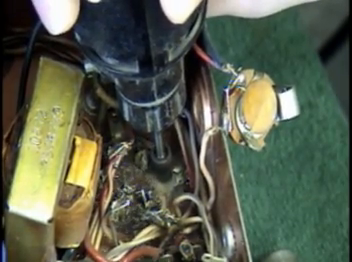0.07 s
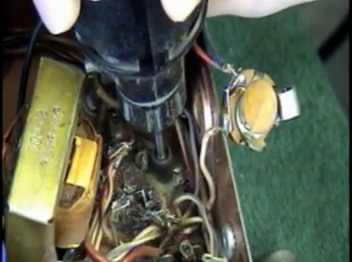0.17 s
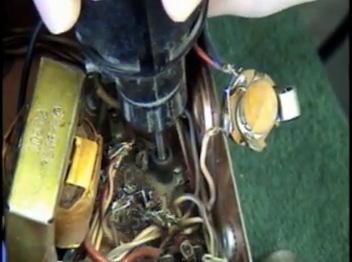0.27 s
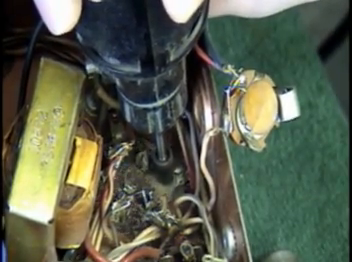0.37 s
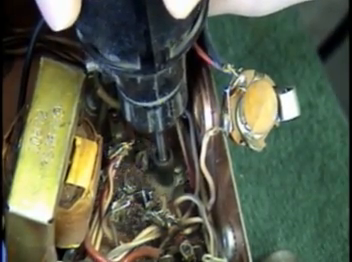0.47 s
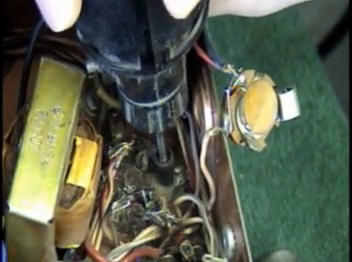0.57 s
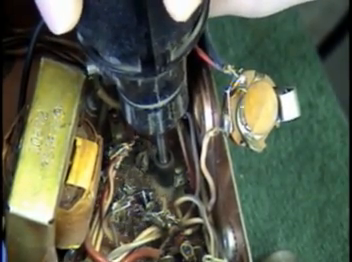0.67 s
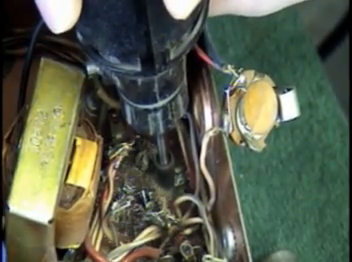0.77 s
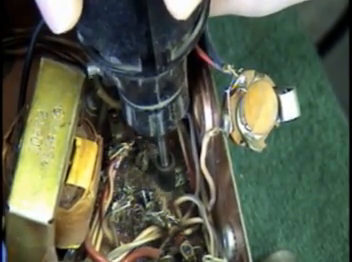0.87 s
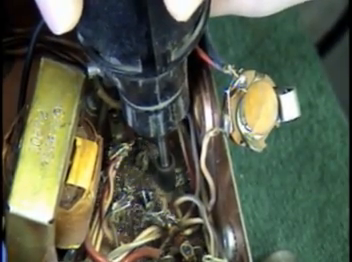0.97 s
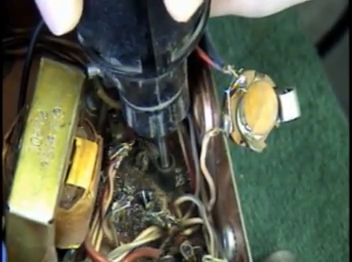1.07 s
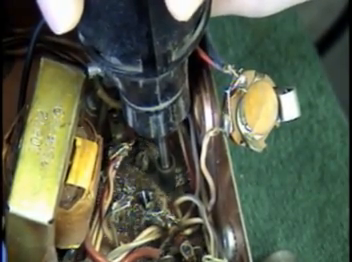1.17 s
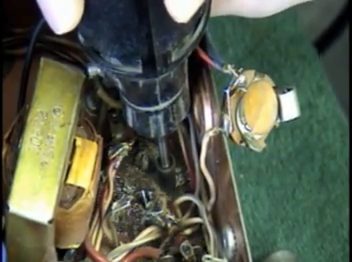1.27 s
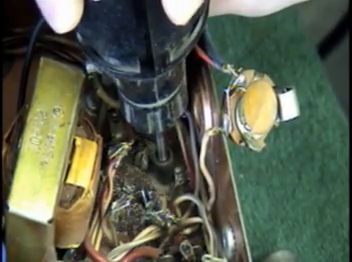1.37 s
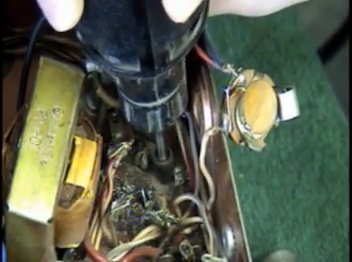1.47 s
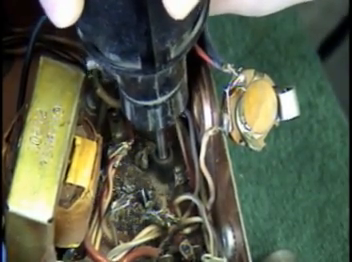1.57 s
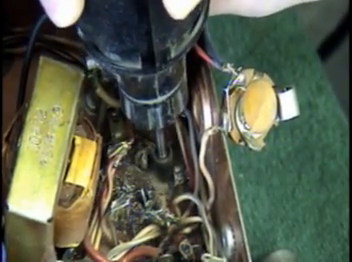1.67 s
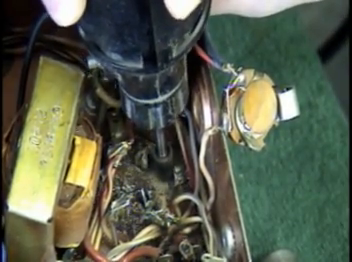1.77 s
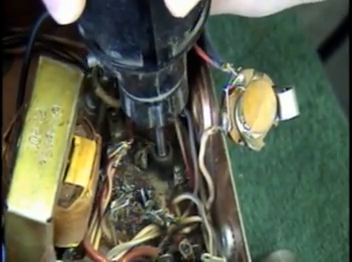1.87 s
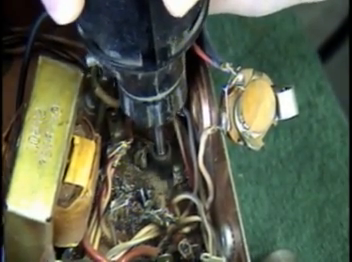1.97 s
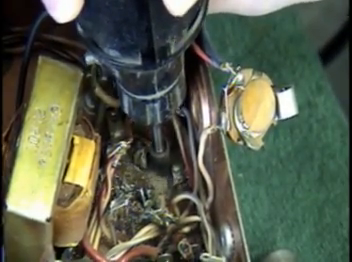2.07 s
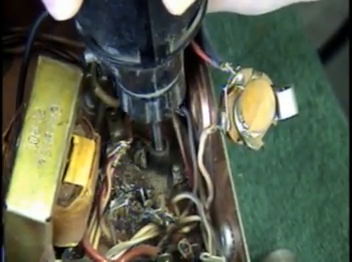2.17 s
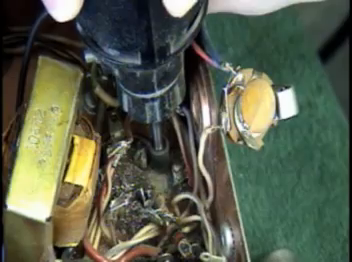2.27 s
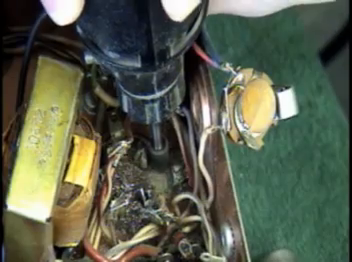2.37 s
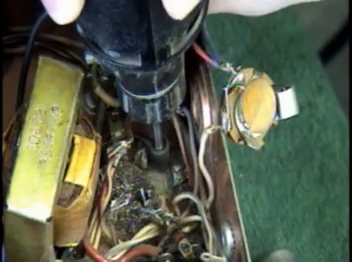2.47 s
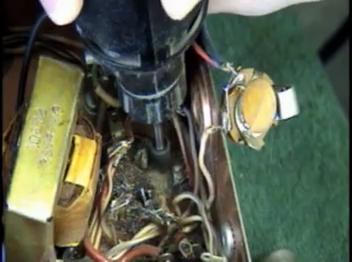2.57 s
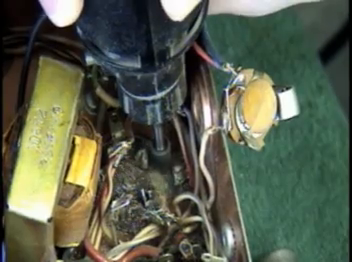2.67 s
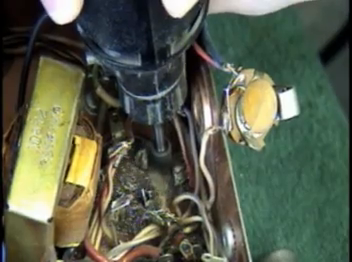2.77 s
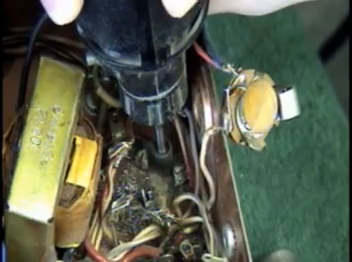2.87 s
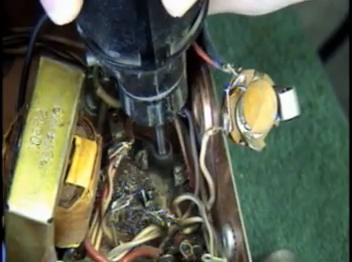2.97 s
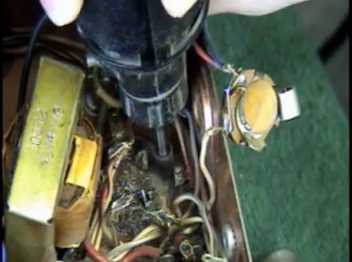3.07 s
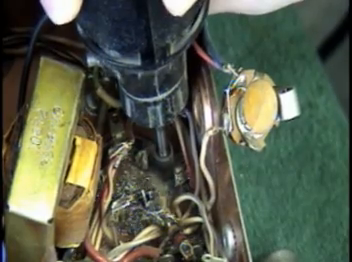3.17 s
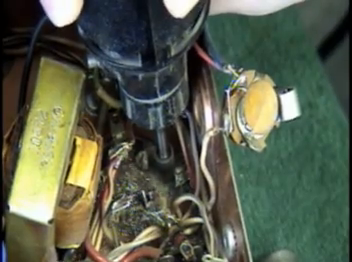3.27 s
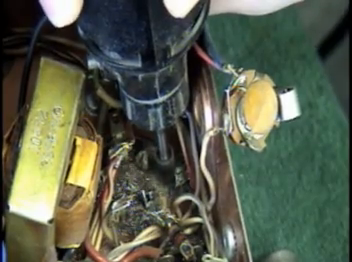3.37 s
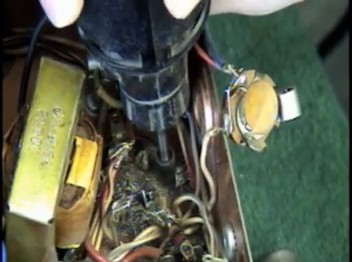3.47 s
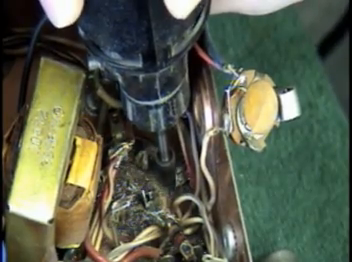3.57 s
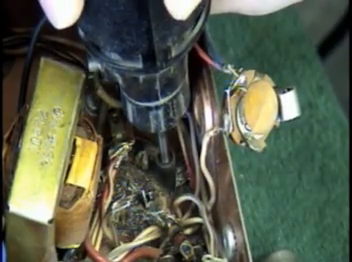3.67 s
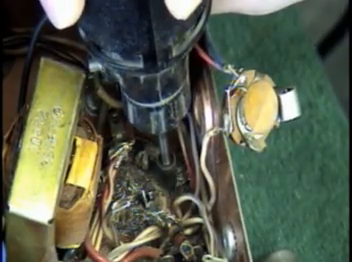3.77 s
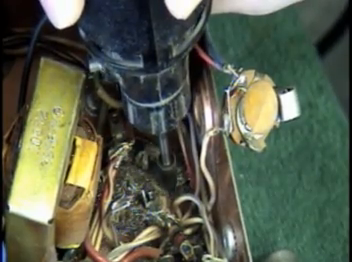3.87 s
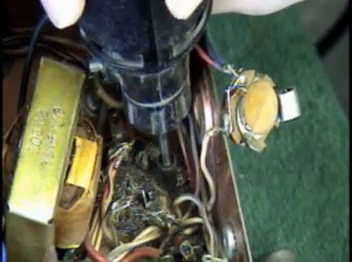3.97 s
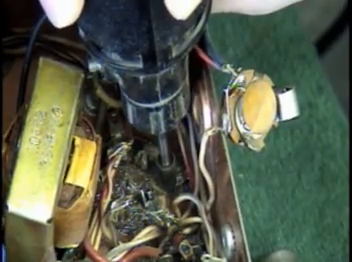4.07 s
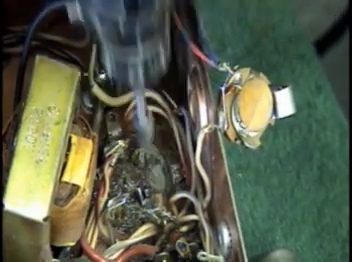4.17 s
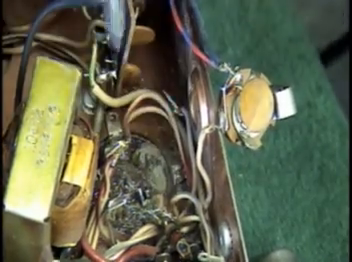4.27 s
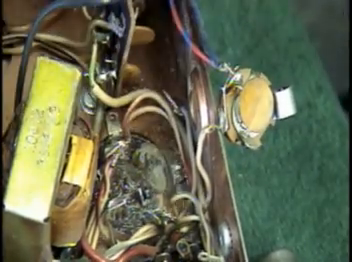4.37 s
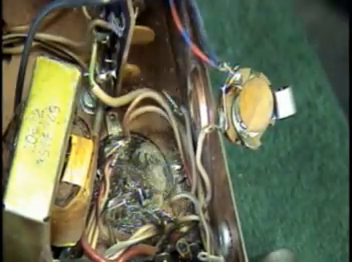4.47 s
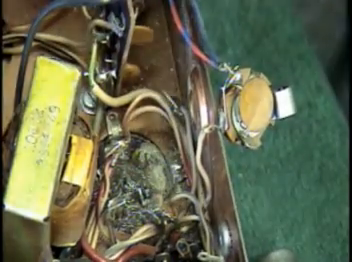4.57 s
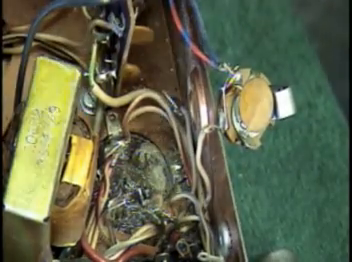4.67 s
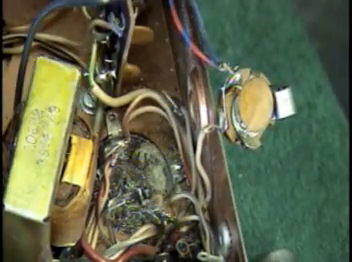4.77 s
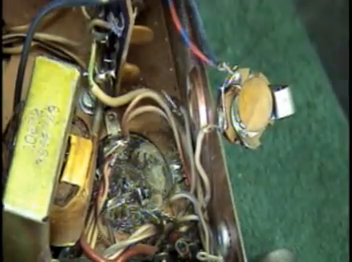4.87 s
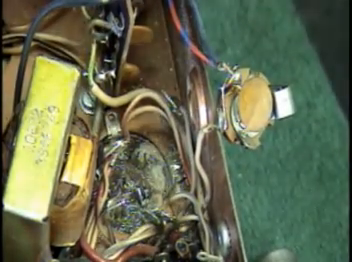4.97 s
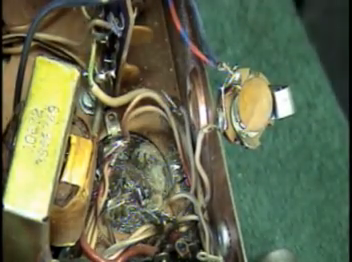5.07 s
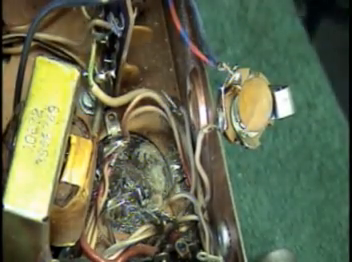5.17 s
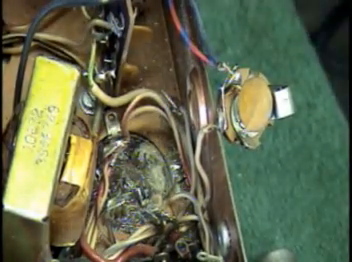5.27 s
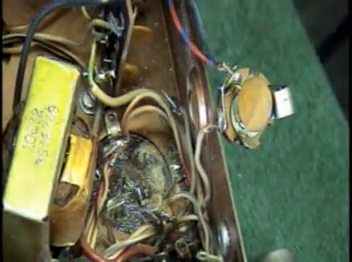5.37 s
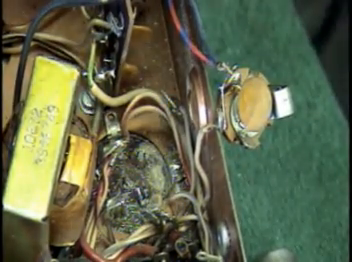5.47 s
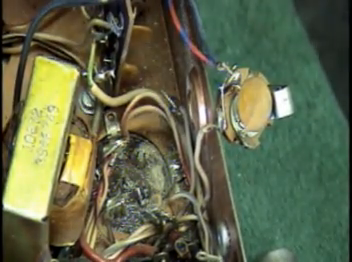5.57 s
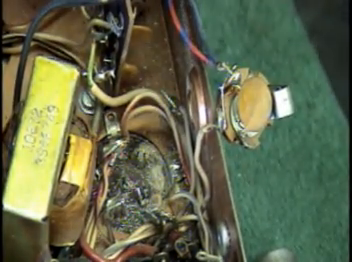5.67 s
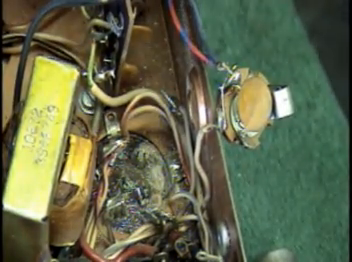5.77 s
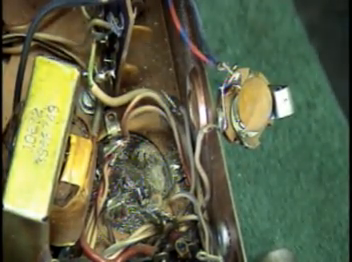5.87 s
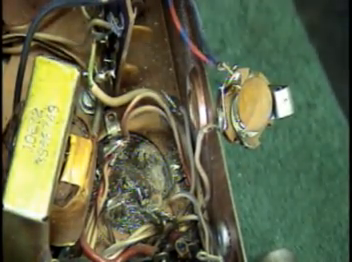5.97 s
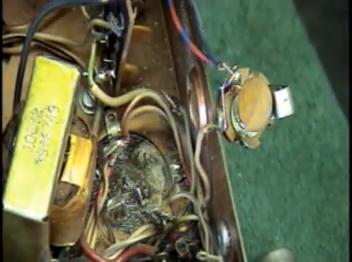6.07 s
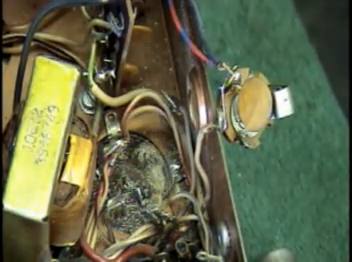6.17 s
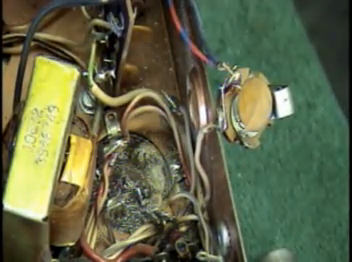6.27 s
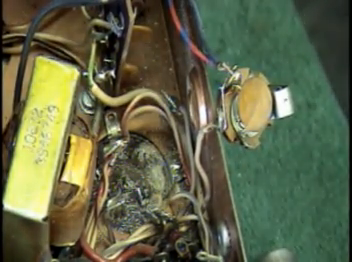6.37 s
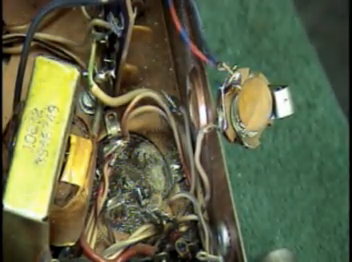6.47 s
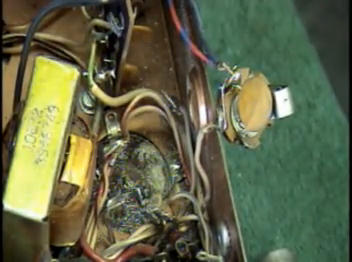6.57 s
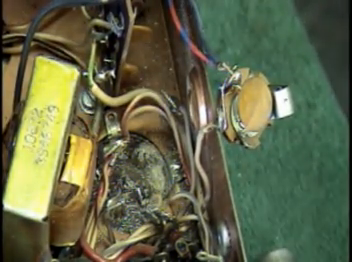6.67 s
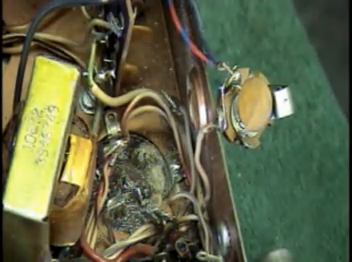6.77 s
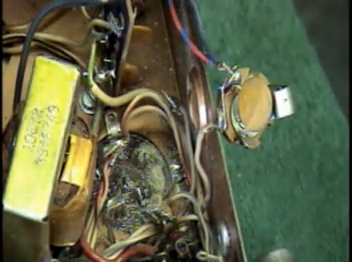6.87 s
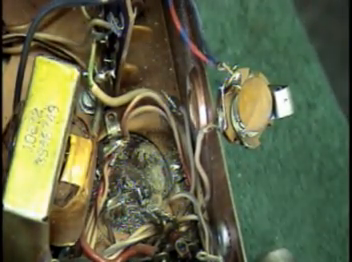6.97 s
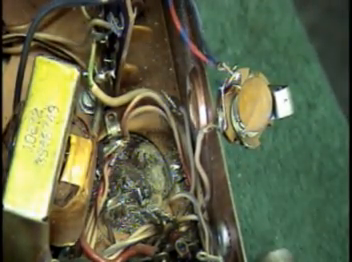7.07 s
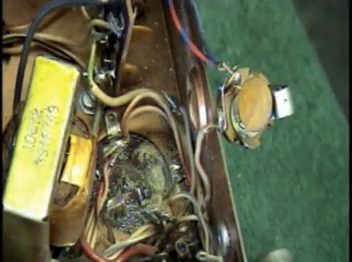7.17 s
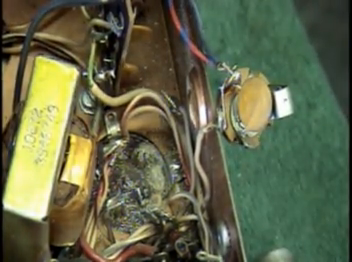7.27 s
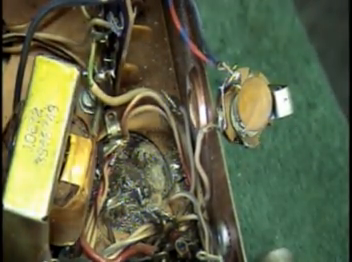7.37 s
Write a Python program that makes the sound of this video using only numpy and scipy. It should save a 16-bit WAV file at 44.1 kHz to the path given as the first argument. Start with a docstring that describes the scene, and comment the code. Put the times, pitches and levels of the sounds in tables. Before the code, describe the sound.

Close up, a small rotary tool grinds a steel tab in a metal chassis: bright gritty scraping, crackle, wavering whine, brief squeals and chatter. The stone lifts off and the motor rises to a cleaner, quieter whine. Then it coasts down, a switch clicks, and the tool is laid on the bench with small knocks. Faint rumble, hum, thin treble whine and hiss remain in a small, fairly dry workshop.

```python
"""Grinding steel with a rotary tool

A handheld rotary tool grinds a steel tab inside a metal chassis; load slows its shaft and the stone chatters.
Rough noise partly repeats with each turn, loose grit crackles, and tones follow the shaft speed.
The stone lifts off, the motor runs free, is switched off, coasts down and is laid on the bench:
noise bursts make the knocks. Low rumble, mains hum, a steady treble whine and hiss lie underneath."""
import sys
import numpy as np
from scipy import signal
from scipy.fft import rfft, irfft, next_fast_len
from scipy.io import wavfile
from scipy.ndimage import uniform_filter1d, map_coordinates

SR = 44100
rng = np.random.default_rng(int(sys.argv[2]) if len(sys.argv) > 2 else 0)


def unload_wav(signal):
    """Save mono or channel-first audio to the path in sys.argv[1] as 16-bit WAV at rate SR, clipped to [-1, 1]."""
    wavfile.write(
        sys.argv[1],
        SR,
        np.round(np.clip(np.atleast_2d(signal).T, -1, 1) * 32767).astype(np.int16),
    )


N = 326761  # samples in the scene

# Shaft speed under load; the last row is the lift-off: [t/s, speed/turns per s]
LOADED_SPEED = [(0.0, 256.5), (0.36, 251), (0.47, 266), (0.7, 282), (0.82, 285), (1.01, 308), (1.28, 316.5),
                (1.37, 330), (1.44, 314), (1.51, 309), (1.71, 315.5), (1.92, 346), (2.03, 350),
                (2.26, 351.5), (2.33, 339), (2.5, 317), (2.58, 304), (2.66, 285), (2.84, 276.5),
                (3.0, 283.3), (3.37, 283.5), (3.64, 292.7), (3.76, 298), (4.1, 313.6), (4.14, 330)]
# Stone scraping steel: [t/s, scrape level/dB, gain of the low end/dB, gain of the treble/dB]
SCRAPE = [(0.0, -22.5, -4, -2), (0.42, -22.5, -2, -2.5), (0.62, -22, -7, -3), (0.85, -22, -1, -4),
          (1.1, -21, -3, -7.5), (1.33, -23, 0.5, -4), (1.46, -25, -5, 1), (1.6, -25.5, -1, 2),
          (1.9, -28.5, 4.5, 2), (2.03, -27, 4.5, -2), (2.15, -27.5, 3, -1.5), (2.3, -22, 3.5, -7.5),
          (2.49, -19, -3.5, -11), (2.7, -21, 2.5, -4), (2.9, -23, 0.5, -1.5), (3.2, -23.5, -5, -1),
          (3.75, -22, -3, -3), (3.95, -24, -4.5, -7.5), (4.15, -29, 2.5, -8.5)]
# Air and brush noise of the motor: [t/s, level/dB, treble level/dB, left over right/dB]
MOTOR_NOISE = [(4.16, -36.5, -41.5, 0.5), (4.37, -35, -37, 0.5), (4.67, -36, -34.5, -0.5),
               (4.82, -34.5, -35.5, 0), (4.95, -38.5, -39, 0.5), (5.15, -40, -40.5, 0.5),
               (5.56, -46.5, -43.5, 0), (5.93, -54, -44, 1), (6.14, -54, -48, 1), (6.34, -61, -53, -0.5),
               (6.5, -66, -76, -3)]
# The stone skips and bites: [t/s, burst level before filtering/dB, length/s]
CHATTER = [(1.381, -22, 0.0083), (1.422, -27, 0.0094), (1.96, -25.5, 0.0078), (2.051, -27.5, 0.011),
           (2.434, -24, 0.0062), (2.49, -24, 0.0069), (2.518, -22.5, .006), (2.576, -23, .006),
           (2.662, -18.5, 0.0067), (3.9, -27, 0.0077), (3.9594, -21, 0.013), (4.03, -25, 0.024),
           (4.083, -27, 0.013)]
# Switch, hands and tool on the bench, before they ring:
# [t/s, relative click level/dB, relative thud level/dB, click centre f/Hz, click time to fall 60 dB/s]
KNOCKS = [(5.006, -23.5, -68, 6720, .04), (5.151, -42, -70, 2983, .05), (5.331, -32.5, -61, 698, 0.2),
          (5.881, -27.5, -63, 958, 0.2), (6.084, -39, -39.5, 2200, 0.15), (6.135, -32, -50, 3320, 0.11),
          (6.1716, -22, -31.5, 1960, 0.095), (6.20, -35.5, -48, 1800, 0.38), (6.229, -38, -47, 1500, 0.18),
          (6.292, -34.5, -41.5, 900, 0.13), (6.321, -43, -54, 791, 0.091), (6.978, -36.5, -58, 1720, 0.23),
          (7.045, -36, -66, 1710, 0.027)]
# Colour of stone on steel: [f/Hz, relative level per Hz/dB]
STEEL_COLOUR = [(120, -71), (200, -74), (320, -32), (476, -29), (560, -22), (789, -19), (1130, -7),
                (1490, -9.5), (1950, -3), (2130, -5), (3060, -3.5), (4160, -7), (7410, -4), (13000, -7),
                (15000, -14)]
# Resonances of the chassis: [f/Hz, width/Hz, relative level/dB]
CHASSIS_MODES = [(1930, 160, -8), (2576, 120, 13), (3030, 33, -6), (3430, 16, 16), (4945, 700, 1.5),
                 (6395, 43, -9), (6390, 73, 9.5), (7590, 62, 17.5), (9000, 67, 0), (9380, 32, -17),
                 (9900, 39, 11), (11700, 200, -43)]
# Colour of the air and brush noise: [f/Hz, relative level per Hz/dB]
AIR_COLOUR = [(120, 5), (200, -30.5), (350, -13), (659, -12.5), (1030, 0), (1330, -5), (1750, 0), (2330, 0),
              (3470, 7), (4230, -1), (7970, 1.5), (13500, -10.5), (15000, -27)]
# Resonances of the tool casing when knocked: [f/Hz, width/Hz, relative level/dB]
CASING_MODES = [(1016, 98, 1), (1770, 47, 8), (2420, 126, -18), (3870, 113, -33)]
# Resonances of the bench: [f/Hz, width/Hz, relative level/dB]
BENCH_MODES = [(93.5, 42, -6), (163, 51, 7), (294.3, 400, 1), (523, 146, 3.5), (685.5, 38, 1.5)]
# Mains hum, before it swells: [f/Hz, relative level/dB]
HUM = [(120, -71), (240, -71), (360, -65.5), (480, -73.5), (720, -72.5), (840, -76)]
# Steady high tones: [f/Hz, relative level/dB]
WHINE = [(4500, -71.5), (5432, -73), (5717, -74), (5814, -72), (6132, -71), (6514, -86), (6794, -69),
         (7278, -69), (7720, -69), (7757, -67), (7854, -69), (10056, -69.5), (10207, -77), (10632, -86)]
# Colour of the hiss: [f/Hz, relative level per Hz/dB]
HISS_COLOUR = [(20, -13), (50, -24), (90, -9), (160, -3.5), (400, -6.5), (1000, -4), (2000, -12),
               (4000, -13), (4600, -9), (7500, -7), (9000, -13), (12500, -20.5), (13300, -60)]
# How alike left and right are: [f/Hz, likeness from 0 to 1]
LIKENESS = [(100, 1), (300, 0.97), (1000, 1), (3000, 0.94), (7000, 0.87), (14000, 0.89)]
# Which side the direct sound leans to: [f/Hz, left over right/dB]
LEAN = [(150, 1), (300, -2.5), (600, 1.1), (1300, 0.5), (2800, 1.5), (5500, -3), (10000, 0.7)]
# How long the room rings: [f/Hz, time to fall 60 dB/s]
ROOM_DECAY = [(200, 0.32), (2000, 0.43), (10000, 0.15)]
# The hum swells: [t/s, gain/dB]
HUM_SWELL = [(0, -22), (4, -15), (5.5, -0.5), (6.5, 1.5), (7, 3.5), (7.41, 5.5)]
# One faint squeak: [t/s, f/Hz, peak level/dB, half length/s]
SQUEAK = (6.49, 4300, -62, .012)
# Steady low rumble: [f/Hz, relative level/dB]
RUMBLE = [(30, -64.5), (60, -69), (120, -74), (150, -84)]
# Resonances of the motor housing: [f/Hz, width/Hz, relative level/dB]
HOUSING_MODES = [(1160, 130, -0.5), (3200, 140, -4), (4900, 110, -8), (7580, 130, 1)]
# A narrow whir as the shaft dies: [t/s, level/dB]
WHIR = [(5.3, -80), (5.7, -70), (5.9, -55), (6.25, -61), (6.38, -64), (6.43, -85)]
# Tones that swell while grinding: [multiple of the shaft speed]
CUT_ORDERS = (2, 4, 5, 6, 7, 8, 9, 11, 12)
# Their levels before the tab blooms: [level over the scrape/dB]
CUT_TONE_LEVELS = (-39.5, -26, -28.5, -29.5, -28, -28, -26, -28, -27)
# Running free: 8 fan blades, overtones and sidebands of fan and commutator: [multiple of the shaft speed]
FREE_ORDERS = (2, 8, 11, 13, 16, 17, 24)
# Their levels at full speed, before the shell blooms: [level/dB]
FREE_TONE_LEVELS = (-63, -59, -60, -59, -63, -63, -66)
# A grinding tone blooms as it passes these resonances of the tab: [f/Hz, width/Hz, relative level/dB]
TAB_MODES = [(1157, 180, -2.5), (1620, 81, 8.5), (1868, 78, 10.5), (2355, 44, 11.5), (3060, 260, 3.5),
             (3700, 160, 2)]
# A free tone blooms as it passes these resonances of the shell: [f/Hz, width/Hz, relative level/dB]
SHELL_MODES = [(1100, 52, 4), (3360, 170, 9), (5300, 93, 6), (6150, 150, -1), (7880, 210, 13.5)]
# Shaft tones that rise and fall throughout:
# [t/s, imbalance level/dB, low grinding tone level/dB, commutator level/dB]
MAIN_TONES = [(0, -72, -54, -46), (.36, -63.5, -60.5, -36), (.8, -65, -43.5, -46), (1.05, -68, -51, -37),
              (1.36, -53, -45, -36.5), (1.6, -76.5, -42.5, -33), (1.8, -52.5, -49, -40.5),
              (1.98, -64, -52, -36.5), (2.15, -55.5, -47, -33), (2.5, -46.5, -42.5, -40),
              (2.8, -55.5, -70, -44), (2.95, -58, -42, -39), (3.4, -66, -46, -37), (3.9, -75, -45, -46),
              (4.1, -55, -52, -40), (4.2, -72, -68, -36.5), (4.4, -61, -70, -37.5), (4.75, -56, -70, -37.5),
              (4.93, -59, -70, -31.5), (5.0, -63, -72, -40), (5.1, -62, -72, -37), (5.3, -72, -70, -50),
              (5.55, -78, -78, -52.5), (5.75, -77, -80, -69), (6.0, -90, -90, -90)]
# Where those three tones sit: [multiple of the shaft speed]
MAIN_ORDERS = (1, 3, 10)
# A shaft tone flares into a squeal: [t/s, multiple of the shaft speed, peak level/dB, half length/s]
SQUEALS = [(0.106, 5, -44, 0.27), (.05, 7, -38, 0.058), (0.397, 4, -36, 0.034), (0.553, 7, -34.5, 0.065),
           (0.697, 4, -38, 0.045), (.72, 9, -39, .05), (0.847, 7, -33, 0.061), (1.05, 4, -45, 0.17),
           (1.376, 9, -28.5, 0.017), (1.385, 5, -38, 0.021), (1.44, 9, -37, 0.027), (2.067, 9, -30, .04),
           (2.183, 11, -37.5, 0.078), (2.24, 5, -34.5, 0.021), (2.343, 7, -30, 0.055), (2.336, 4, -37, .05),
           (2.52, 5, -37, 0.081), (2.677, 4, -31.5, 0.015), (2.766, 7, -33.5, 0.061), (2.948, 7, -35, 0.12),
           (3.004, 4, -40, 0.18), (3.25, 23, -34, .1), (3.647, 4, -42, .08), (3.7, 5, -44, .15),
           (3.927, 8, -33.5, 0.054), (4.45, 16, -51, .17), (5.43, 16, -48, 0.045), (5.464, 24, -51, .03)]

REPEATS, FREE_REPEATS = 0.52, 0.5  # share of the roughness power that repeats each turn: grinding, motor
FREE_HZ, SPIN_UP_S, OFF_S = 388.3, .072, 4.815  # free speed, time constant to reach it, switch-off
# Coasting: steady braking, plus speed lost early to fan drag and the time constant of that loss
FRICTION_HZ_PER_S, DRAG_HZ, DRAG_S = 190, 62, .34
FADE_DB_PER_OCTAVE = 12  # free tones weaken as the shaft slows
OCTAVE_DB = -56  # octave of the commutator tone, at full speed before the shell blooms
WALL_ECHO_S, WALL_ECHO = 0.000492, 0.19  # a near chassis wall: delay, strength in the high treble
TOP_HZ = 15140  # band limit of the whole scene


def amp(db):
    """Gain of a level in dB."""
    return 10 ** (np.asarray(db) / 20)


def unit(x):
    """x scaled to an average (rms) level of 1."""
    return x / np.sqrt(np.mean(x ** 2) + 1e-20)


def along(points, hz):
    """Read a value at hz between table points, on a log frequency axis."""
    f, v = np.transpose(points)
    return np.interp(np.log(hz + 1), np.log(f + 1), v)


def curves(rows):
    """One value per sample for each column after the time; the end values hold outside the table."""
    s, *cols = np.transpose(rows)
    return [np.interp(np.arange(N) / SR, s, c) for c in cols]


def wobble(rate):
    """A smooth random curve with rate new points a second."""
    points = rng.standard_normal(int(N * rate / SR) + 4)
    return map_coordinates(points, [np.arange(N) * rate / SR])


def filtered(x, response):
    """Shape the spectrum of x by a response given as a function of frequency."""
    m = next_fast_len(N + SR // 2)
    return irfft(rfft(x, m) * response(np.fft.rfftfreq(m, 1 / SR)), m)[..., :N]


def modes(table):
    """Response of a set of resonances, each one opposite in sign to the one before."""
    def mode(f, centre, width):
        return 1j * f * width / (centre * centre - f * f + 1j * f * width)
    return lambda f: sum((-1) ** k * amp(db) * mode(f, c, w) for k, (c, w, db) in enumerate(table))


def split(x, low_db, high_db, low_hz, high_hz):
    """Give the low and high ends of x their own gains."""
    low = filtered(x, lambda f: 1 / (1 + (f / low_hz) ** 8))
    high = filtered(x, lambda f: 1 - 1 / (1 + (f / high_hz) ** 8))
    middle = x - low - high
    return middle + amp(low_db) * low + amp(high_db) * high


def per_turn(turns, wear, spiky_db, size):
    """A rough profile of size points, read once a turn; it blends into a new one wear times a second."""
    shape = (int(N * wear / SR) + 4, size)
    spikes = amp(spiky_db * np.minimum(rng.exponential(1, shape), 2.5))
    rim = rng.standard_normal(shape) * spikes
    rim /= np.std(rim, axis=1, keepdims=True)
    rim = np.concatenate([rim, rim[:, :2]], 1)  # join the end of the turn to its start
    place = [np.arange(N) * wear / SR, turns % 1 * size]
    return unit(map_coordinates(rim, place, order=1))


def tones(turns, orders, levels, flutter_db, slip):
    """Sines at multiples of the shaft speed that flutter in level and slip in phase."""
    total = 0
    for k, db in zip(orders, levels):
        gain = np.sqrt(2) * amp(db + flutter_db * wobble(35))
        total = total + gain * np.sin(2 * np.pi * k * turns + slip * wobble(40))
    return total


def background():
    """Low rumble, mains hum and whine are sums of fixed-pitch sines; hiss is noise, wider in the treble."""
    t = np.arange(N) / SR

    def sines(table):
        return sum(amp(db + 0.5 + 0.74 * wobble(15)) * np.sin(2 * np.pi * (hz * t + rng.random()))
                   for hz, db in table)

    def hiss_colour(f):
        return amp(along(HISS_COLOUR, f)) * [np.ones_like(f), 1.38 * f / (f + 900)]

    hum = amp(curves(HUM_SWELL)[0]) * sines(HUM)
    whine = sines(WHINE) * amp([[-1.5], [1.5]])  # left, right
    mid, side = filtered(rng.standard_normal((2, N)), hiss_colour)
    hiss = amp(-56.0) * unit(np.array([mid + side, mid - side])) * amp([[-.8], [.8]])
    return sines(RUMBLE) + hum + whine + hiss


def shaft():
    """Turns per second: held down by the load, then rising to free speed, then coasting."""
    t, (lift_s, lift_hz) = np.arange(N) / SR, LOADED_SPEED[-1]
    rising = FREE_HZ - (FREE_HZ - lift_hz) * np.exp(-np.clip(t - lift_s, 0, None) / SPIN_UP_S)
    off = np.clip(t - OFF_S, 0, None)  # time since switch-off
    lost = FRICTION_HZ_PER_S * off + DRAG_HZ * (1 - np.exp(-off / DRAG_S))
    return np.where(t < lift_s, curves(LOADED_SPEED)[0], np.clip(rising - lost, 1, None))


def grinding(turns):
    """The stone's rim repeats each turn; loose grit adds crackle; both ring in the chassis."""
    scrape_db, low_db, sizzle_db = curves(SCRAPE)
    t = np.arange(N) / SR

    def colour(f):
        return amp(along(STEEL_COLOUR, f)) * (1 + 0.55 * modes(CHASSIS_MODES)(f))

    def wall(f):  # the treble comes back inverted
        echo = np.exp(-2j * np.pi * f * WALL_ECHO_S) * f ** 2 / (f ** 2 + 5000 ** 2)
        return 1 - WALL_ECHO * echo

    rim = unit(filtered(per_turn(turns, wear=16.0, spiky_db=5.0, size=128), colour))
    spikes = np.minimum(rng.exponential(1, N), 3.5)
    grit = rng.standard_normal(N) * amp(1.8 * spikes + 0.7 * wobble(300))
    # high spots throw grit at similar angles from turn to turn
    grit *= amp(3.0 * per_turn(turns, wear=6.0, spiky_db=0, size=5))
    # the flow of grit is even over several turns
    grit /= np.sqrt(np.abs(uniform_filter1d(grit ** 2, size=1500)))
    grit = unit(filtered(grit, colour))

    # fine roughness hardly survives from turn to turn, so the treble is mostly grit
    repeating = np.sqrt(REPEATS) * rim + (np.sqrt(1 - REPEATS) - 1) * grit
    scrape = filtered(repeating, lambda f: 1 / (1 + (f / 10000) ** 2)) + grit
    scrape = split(scrape, low_db, sizzle_db, low_hz=2000, high_hz=6200)
    scrape *= amp(scrape_db + 1.0 * wobble(40) + 0.93 * wobble(15))

    bites = sum(amp(db) * np.exp(-((t - s - life / 2) / life) ** 2) for s, db, life in CHATTER)
    blunt = filtered(grit, lambda f: 1 / (1 + (f / 5500) ** 4))  # a bite shakes more than it hisses
    lift = amp(-60 * np.clip(t - SCRAPE[-1][0], 0, None) / .03)  # contact ends quickly
    return filtered((scrape + bites * (blunt + 0.27 * grit)) * lift, wall)


def motor(turns):
    """Cooling air and brushes make noise; the bright part of the rattle repeats each turn."""
    body_db, treble_db, _ = curves(MOTOR_NOISE)

    def colour(f):
        no_bass = f ** 4 / (f ** 4 + 200 ** 4)
        return amp(along(AIR_COLOUR, f)) * (1 + modes(HOUSING_MODES)(f)) * no_bass

    rattle = unit(filtered(per_turn(turns, wear=7.0, spiky_db=1.5, size=224), colour))
    air = unit(filtered(rng.standard_normal(N), colour))
    repeating = np.sqrt(FREE_REPEATS) * rattle + (np.sqrt(1 - FREE_REPEATS) - 1) * air
    rush = filtered(repeating, lambda f: f ** 4 / (f ** 4 + 2400 ** 4)) + air
    rush = split(rush, 0.1, treble_db - body_db, low_hz=800, high_hz=4800)
    rush *= amp(body_db + 0.47 * wobble(12))
    whir = unit(filtered(rng.standard_normal(N), modes([(5250, 250, 0.1)])))
    return rush + whir * amp(curves(WHIR)[0] + 1.42 * wobble(30))


def squeals(turns):
    """Each squeal is a sine at one multiple of the shaft speed that swells and fades."""
    t, total = np.arange(N) / SR, 0
    for order in sorted({round(k) for _, k, _, _ in SQUEALS}):
        swell = sum(amp(db) * np.exp(-((t - s) / half) ** 2)
                    for s, k, db, half in SQUEALS if round(k) == order)
        total = total + swell * tones(turns, [order], [0], flutter_db=2.0, slip=.4)
    return total


def tool():
    """All sound of the turning tool: noise, partly repeating each turn, a whir, and tones that follow the speed."""
    t, speed = np.arange(N) / SR, shaft()
    free = np.clip((t - LOADED_SPEED[-1][0]) / 0.0218, 0, 1)  # 0 while grinding, 1 once lifted off
    uneven = (.002 - 0.00159 * free) * wobble(40)  # load makes the speed less even
    turns = np.cumsum(speed * (1 + uneven)) / SR

    def bloom(table):
        return lambda f: 1 + abs(modes(table)(f))

    def swelling(levels, depth_db):  # each tone swells on its own
        return [db + depth_db * wobble(7) for db in levels]

    main = tones(turns, MAIN_ORDERS, curves(MAIN_TONES), flutter_db=2.8 - free, slip=.45)
    cut_levels = swelling(CUT_TONE_LEVELS, depth_db=2.0)
    cutting = tones(turns, CUT_ORDERS, cut_levels, flutter_db=3.0, slip=.45)
    loaded = filtered(amp(curves(SCRAPE)[0]) * cutting, bloom(TAB_MODES))
    free_levels = swelling(FREE_TONE_LEVELS, depth_db=3.0)
    spinning = tones(turns, FREE_ORDERS, free_levels, flutter_db=3.0, slip=.45)
    spinning = spinning + tones(turns, [20], [OCTAVE_DB], flutter_db=1.5, slip=.3)
    fade = amp(FADE_DB_PER_OCTAVE * np.log2(speed / FREE_HZ))
    running = filtered(fade * spinning, bloom(SHELL_MODES))
    return grinding(turns) + motor(turns) + main + squeals(turns) + loaded * (1 - free) + running * free


def knocks():
    """Each contact is a click of its own colour, partly ringing in the casing, and a longer bench thud."""
    click, thud, t = np.zeros(N + SR), np.zeros(N + SR), np.arange(SR // 2) / SR
    for s, db, thud_db, hz, t60 in KNOCKS:
        start = round(s * SR)
        b, a = signal.iirpeak(hz, 1.2, SR)
        burst = amp(db + 5 - 60 * t / t60) * rng.standard_normal(len(t))
        click[start:][:len(t)] += signal.lfilter(b, a, burst)
        # the thud lasts 2.24 times as long as the click
        thud[start:][:len(t)] += amp(thud_db - 60 * t / (2.24 * t60)) * rng.standard_normal(len(t))

    def casing(f):
        return (0.54 + 0.64 * modes(CASING_MODES)(f)) / (1 + (f / 8000) ** 6)

    return filtered(click[:N], casing) + amp(15.0) * filtered(thud[:N], modes(BENCH_MODES))


def squeak():
    """A single short sine that swells and fades."""
    s, hz, db, half = SQUEAK
    t = np.arange(N) / SR
    return amp(db) * np.exp(-((t - s) / half) ** 2) * np.sin(2 * np.pi * hz * t)


def room(x):
    """Fading noise stands in for the room's echoes; stronger where left and right are less alike."""
    hz, t, z = signal.stft(rng.standard_normal((2, SR // 2)), SR, nperseg=256)
    fading = z * amp(-60 * t / along(ROOM_DECAY, hz)[:, None])
    tail = signal.istft(fading, SR, nperseg=256)[1]
    tail = tail / np.linalg.norm(tail[0])
    late = np.pad(x, (300, 0))[None]  # the echoes start 300 samples late
    wet = signal.fftconvolve(late, tail, axes=1)[:, :N]
    return filtered(wet, lambda f: np.sqrt(1 - np.clip(along(LIKENESS, f), 0, .995)))


def scene():
    """Direct sound, leaning left or right by frequency and as the tool moves off, plus room and background."""
    near = tool() + knocks() + squeak()
    direct = filtered(near, lambda f: amp(np.outer([.5, -.5], along(LEAN, f))))
    away = amp(np.outer([.5, -.5], curves(MOTOR_NOISE)[2]))
    return amp(-0.03) * direct * away + amp(1.5) * room(near) + background()


def record(dry):
    """Nothing is kept above the band limit."""
    return filtered(dry, lambda hz: hz < TOP_HZ)


dry = scene()
out = record(dry)
unload_wav(out)
```